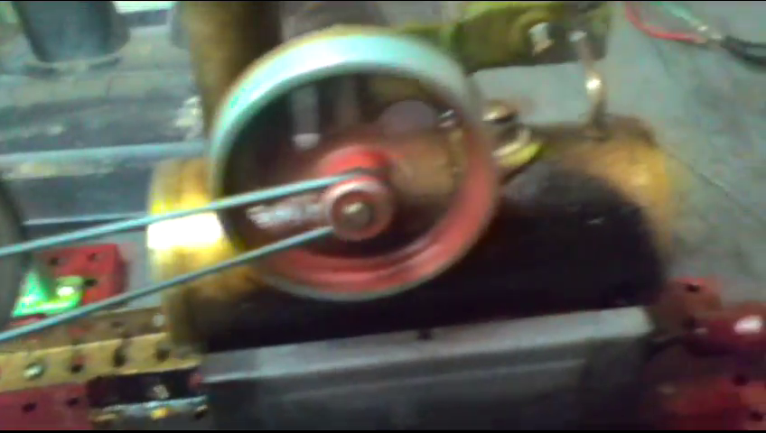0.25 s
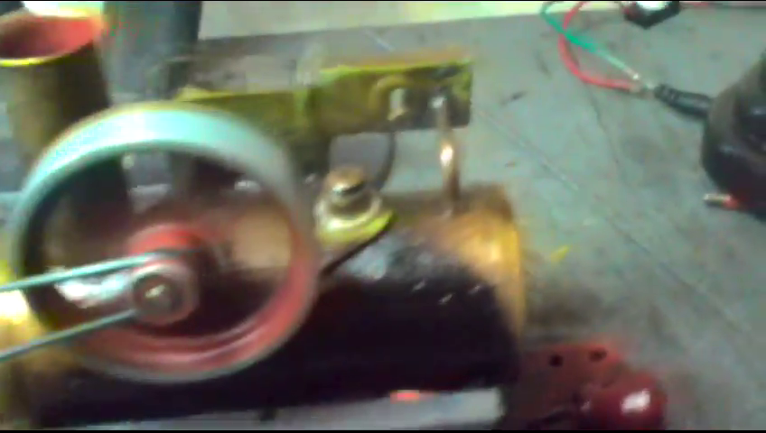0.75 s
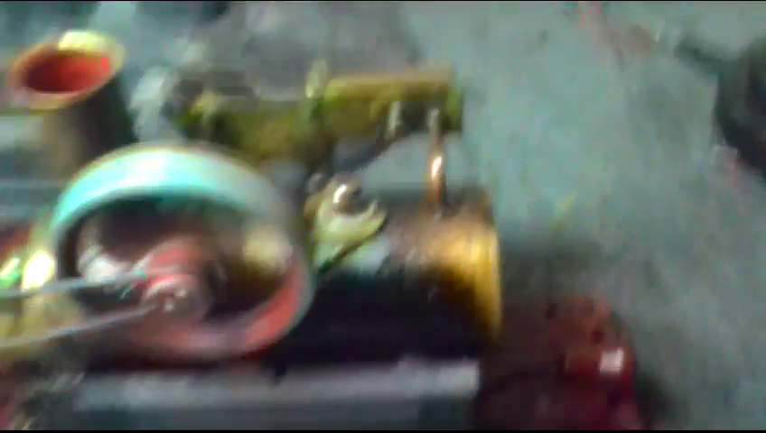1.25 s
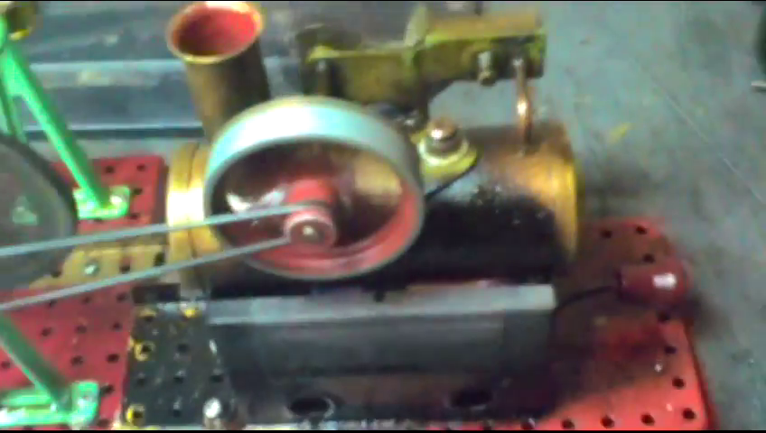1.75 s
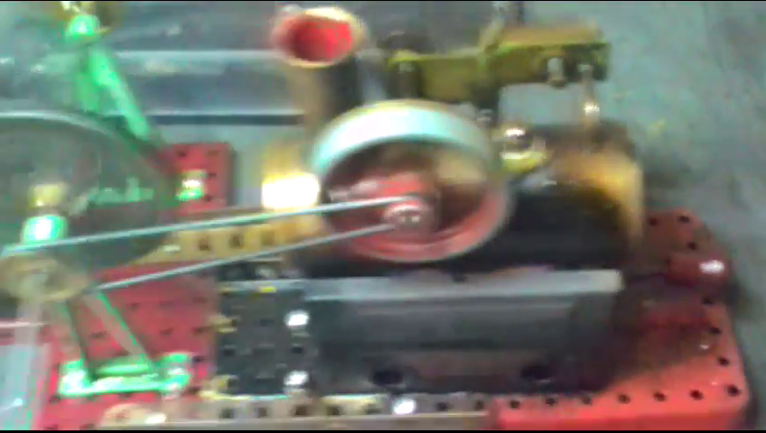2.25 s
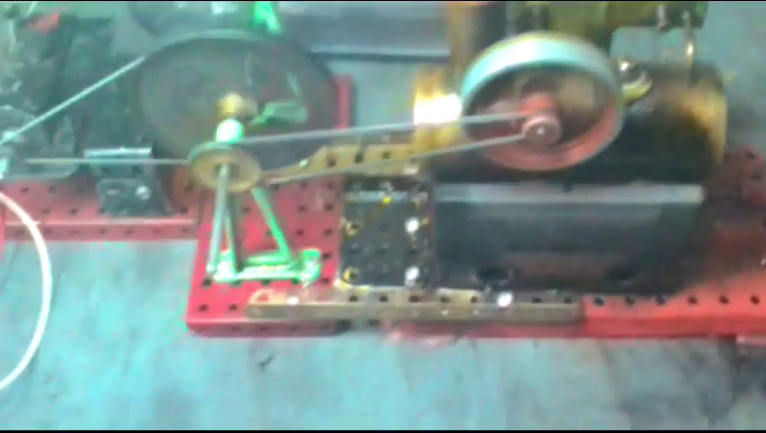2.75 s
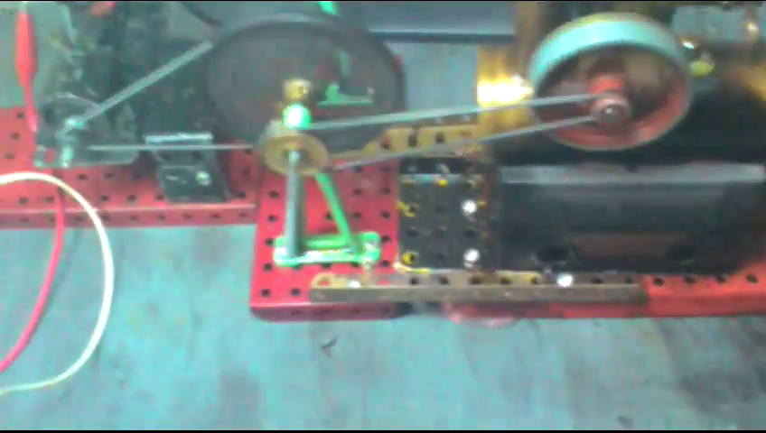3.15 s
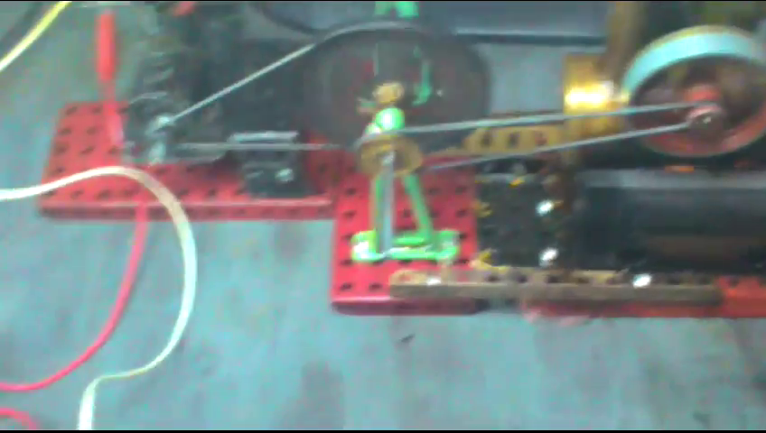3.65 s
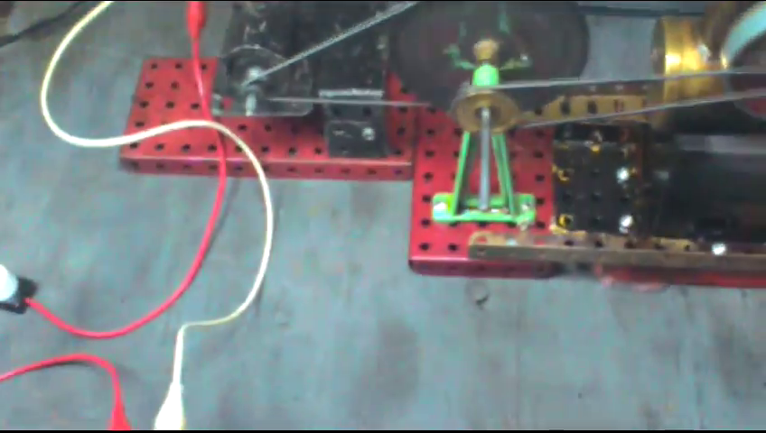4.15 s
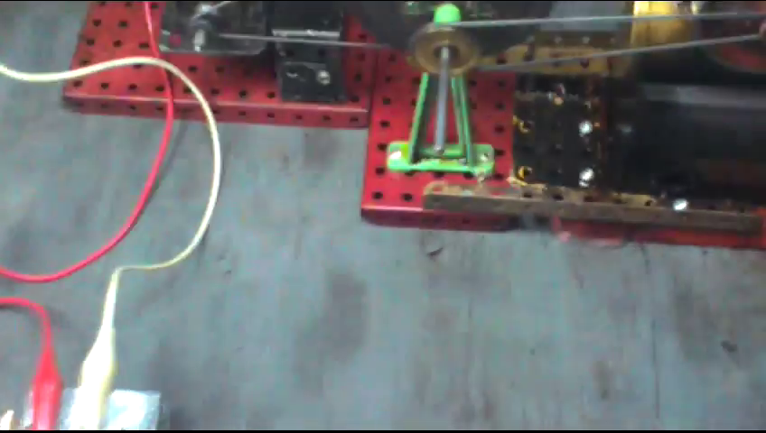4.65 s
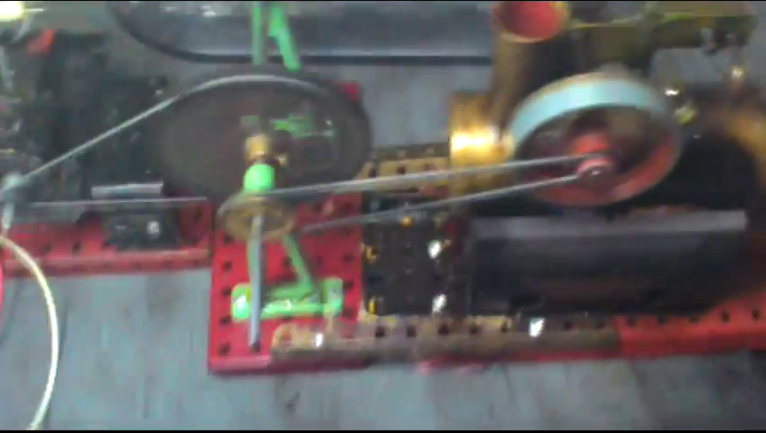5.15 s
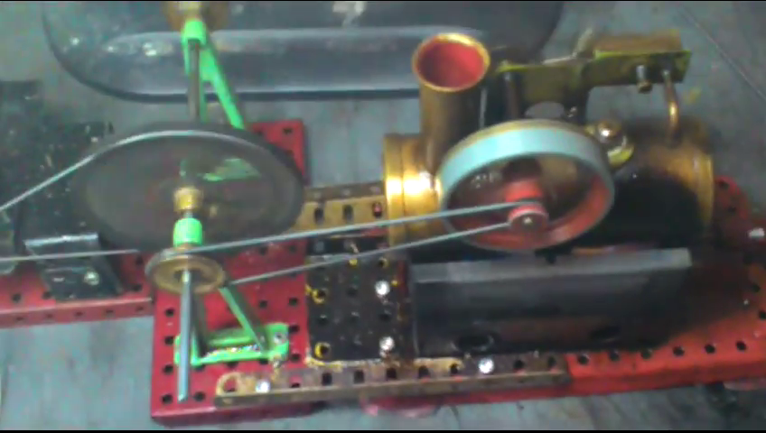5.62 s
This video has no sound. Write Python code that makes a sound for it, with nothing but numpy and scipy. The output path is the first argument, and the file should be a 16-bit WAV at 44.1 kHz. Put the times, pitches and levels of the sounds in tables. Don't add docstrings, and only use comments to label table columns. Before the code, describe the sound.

A model steam engine runs without pause on a metal base plate in a room. Its loose crank knocks about twenty-six times a second, each knock trailed by tiny clicks and rattles, fusing into a rough metallic buzz over a low plate hum. A close hand-held microphone starts at the boiler, bright and clattery, backs off to a duller, ringing whirr, then nears the shaft and grows louder.

```python
import sys
import numpy as np
from scipy import signal
from scipy.fft import rfft, irfft
from scipy.io import wavfile
from scipy.ndimage import uniform_filter1d

SR = 44100
rng = np.random.default_rng(int(sys.argv[2]) if len(sys.argv) > 2 else 0)


def how_loud(loudness_db):
    steps = np.asarray(loudness_db, float) / 20
    return 10 ** steps


def materialize(psi):
    bounded = np.clip(np.atleast_2d(psi).T, -1, 1)
    quanta = np.round(bounded * 32767).astype(np.int16)
    wavfile.write(sys.argv[1], SR, quanta)


N = 259352

TURN_S, FIRST_KNOCK_S = 0.03769, 0.0361
BELT_S, BELT_START_S, BELT_SWING_MS, BELT_TIGHT_S = 0.75, 0.018, 0.48, 0.45
# time_s, knock_late_ms
SPEED_DRIFT = [(0, 1.11), (.6, -.68), (1.3, -1.12), (2, .78), (2.8, -.59), (3.5, .79), (4.2, .89),
               (4.8, 1.26), (5.4, -.68), (5.88, -3.07)]
# time_s, force_db
KNOCK_FORCE = [(0, 3), (.4, 4), (.9, -1.5), (1.2, 0), (1.6, -3), (1.95, 6), (2.25, 1), (2.72, 6.5),
               (3.0, -1), (3.25, 0.5), (3.36, 6.5), (3.7, 0.5), (3.98, -3.5), (4.04, 3.5), (4.35, -2),
               (4.72, -4), (4.85, 2.5), (5.88, 4)]
# pitch_hz, fade_60db_s, signed_strength_thousandths, after_knock_ms
BASE_MODES = [(115.0, 0.058, -3.8, 2.25), (156.2, 0.145, -3.95, 0.53), (242.1, 0.221, 8.7, 1.67),
              (261.8, 0.028, -7.84, 10.74), (332.1, 0.048, 7.02, 2.91)]
# after_knock_ms, decay_ms, frame_db, linkage_db, flywheel_db, boiler_db, steam_db
BOUNCES = [
    (0.511, 4.9, 6, 7.5, 0, 0, 4),
    (2.58, 4.15, 4.5, 9, -7.5, -2.5, -9),
    (6.23, 2.3, -26, -16, -5.5, -24, -25),
    (9.206, 0.36, -1, 7, -20, 5, -4),
    (13.43, 4.8, -6.5, -11.5, -9, -49, -2),
    (16.75, 1.36, -4.5, -21, -19, -2.5, 2),
    (24.24, 4.3, -8.5, -22, -33, -20, -25),
    (29.1, 5.2, -2, -10.5, -37, -41, -16.5),
]

RUBBING_DB = [-8, -8, -23, -17.5, -27.5]
REPEAT_SHARE = [0.892, 0.9, 0.885, 0.63, 0.15]
CRANK_BLOW_DB = [24, 26.5, 26.5, 21, 9]
CRANK_BLOW_MS = [1.2, -.3, -.8, -.4, -.7]
REBOUND_DB = [-9, -3.5, -8.5, -3.5, -3]
REBOUND_MS = 2.4
TURN_SPREAD_DB = [.8, 1.2, 1.7, 2.06, 3.2]
WEAK_MODES_DB = [-30, -24, -47, -30, -60]
PART_EDGES_HZ = [370, 2450, 4400, 5400, 8300, 15800]

# pitch_hz, width_hz, boiler_view_db, backing_off_db, far_db, shaft_view_db
FRAME_MODES = [(448, 59, -18, -19.5, -14.5, -7.5), (551.5, 94, -18, -15.5, -24.5, -13.5),
               (649.5, 66, -8.5, -14.5, -23, -12), (779, 101, -17, -23.5, -27, -18),
               (899.5, 79, -17.5, -34, -26, -21.5), (1043, 60, -15.5, -41, -17, -16.5),
               (1130, 73, -17, -13.5, -18.5, -19), (1222, 61, -27.5, -26.5, -16.5, -8.5),
               (1367, 109, -28, -27, -23, -14), (1478, 98, -15.5, -18.5, -24, -21.5),
               (1651, 58, -11, -20.5, -29, -20), (1807, 191, -10, -16.5, -24.5, -18.5),
               (2048, 125, -14, -20, -26, -20), (2334, 440, -21, -22, -32.5, -31.5)]
LINKAGE_MODES = [(2799, 16, -16.5, -18.5, -19.5, -18), (2940, 69, -12.5, -22, -26, -11),
                 (3030, 112, -10.5, -22, -22.5, -9), (3308, 137, -14, -14.5, -29, -17),
                 (3487, 103, -16.5, -16.5, -25, -10.5), (3984, 250, -52, -14, -14, -17),
                 (4188, 96, -18, -4, -20.5, -7)]
FLYWHEEL_MODES = [(4574, 102, -6, -11, -23, -1), (4794, 137, -34, -11, -13, -3),
                  (4884, 175, -30, -18, -6.5, -6), (5020, 115, -23, -11.5, -4.5, -30)]
BOILER_MODES = [(5620, 33, -33, -37, -10, -3), (5866, 147, -0.5, 4, -9.5, -6.5),
                (6135, 250, 1, -1.5, -21, -10.5), (6380, 360, -3.5, -5.5, -27.5, -3.5),
                (6950, 150, -10, -18, -25.5, -9), (7230, 473, -10, -20, -20.5, -17.5),
                (7710, 100, -24, -18, -26, -23)]
STEAM_MODES = [(8370, 180, -34, -27, -32, -28), (9120, 280, -31.5, -34, -42, -36),
               (10040, 120, -24.5, -27.5, -42, -39), (11050, 780, -41, -41.5, -43, -41),
               (12750, 870, -47, -49, -55, -53), (15400, 600, -72, -64, -78, -56)]

# time_s, position (0 over the boiler, 1 backing off, 2 far, 3 over the shaft)
POSITION = [(0, 0), (.6, 0.03), (1.2, 0.28), (1.35, 0.68), (1.75, 0.77), (2.2, 1.4), (2.6, 1.79), (3.3, 2),
            (3.9, 2), (4.3, 2.5), (4.6, 2), (4.85, 2.6), (5.3, 2.5), (5.88, 2.5)]
RUBBING_GAIN_DB = [0.82, 1.5, 4.44, 4.5]
RUBBING_STAYS = 0.32

# boiler_view_db, backing_off_db, far_db, shaft_view_db
PART_LOUDNESS = [(-46, -46.5, -46.5, -44), (-43, -48.5, -50, -43), (-44.5, -45, -48, -42),
                 (-47, -46.5, -41, -34.5), (-35.5, -39.5, -47.5, -40.5), (-62.5, -64, -62, -55.5)]
FORCE_SHARE = [0.0071, -0.026, 0.6, 0.76, 0.38, 0.012]
BELT_SWELL_DB = [-0.43, 1.35, 0.32, .3, -0.48, -.3]
# time_s, over_hiss_db
STEAM_SPITS = [
    (.4, 5.5),
    (2.42, 3),
    (3.82, 4),
    (5.1, 2.5),
]
SPIT_S = 0.037

# pitch_hz, level_db
ROOM_RUMBLE = [(20, -3), (60, -3.5), (150, -0.5), (330, 8), (500, -10), (900, -5.5), (3000, -28.5)]
RUMBLE_DB = -60.5
# pitch_hz, left_lag_rad
OPENING_LAG = [(500, 0.0025), (1500, 0.043), (3000, 0.19), (4600, 0.61), (6200, 0.67), (7800, 0.38),
               (10000, 0.1), (15000, .8)]
# pitch_hz, side_db
SCATTERED = [(60, -28), (130, -48), (290, -70), (640, -21), (1400, -19), (3100, -13.5), (4800, -23),
             (6500, -9), (8000, -3.5), (11000, -1.5)]
# pitch_hz, share_of_time
DROPOUTS = [(1800, 0), (2500, 0.04), (3200, 0), (7500, 0.02), (8600, 0.097), (9400, 0.19), (11000, 0.032),
            (12500, .45), (14000, .75), (15500, .78)]


def rms_one(x):
    return x / np.sqrt(np.mean(x ** 2) + 1e-20)


def in_time(rows):
    s, value = np.transpose(rows)
    return np.interp(np.arange(N) / SR, s, value)


def at_hz(points):
    hz, value = np.transpose(points)
    return np.interp(np.log(np.fft.rfftfreq(N, 1 / SR) + 1), np.log(hz), value)


def at_position(values):
    return np.interp(in_time(POSITION), range(4), values)


def steady(x):
    return x / np.sqrt(uniform_filter1d(x ** 2, round(4 * TURN_S * SR)) + 1e-20)


def resonance(x, hz, width):
    r = np.exp(-np.pi * 1.55 * max(width, hz / 70) / SR)
    b = np.array([1, 0, -1]) * (1 - r * r) / 2
    a = [1, -2 * r * np.cos(2 * np.pi * hz / SR), r * r]
    return signal.lfilter(b, a, signal.lfilter(b, a, x))


def rumble():
    noise = rng.standard_normal(N)
    return how_loud(RUMBLE_DB) * rms_one(irfft(rfft(noise) * how_loud(at_hz(ROOM_RUMBLE)), N))


def knocks():
    even = FIRST_KNOCK_S + TURN_S * np.arange(-10, 158)
    drift_ms = np.interp(even, *np.transpose(SPEED_DRIFT))
    swing_ms = BELT_SWING_MS * np.sin(2 * np.pi * (even - BELT_START_S) / BELT_S)
    return np.round((even + (drift_ms + swing_ms) / 1000) * SR).astype(int)


def base_plate(at, level_db):
    lead = -at[0]
    out = 0
    strength = how_loud(rng.normal(0, 0.13, len(at)))
    for hz, t60, push, after_ms in BASE_MODES:
        clicks = np.zeros(at[-1] + lead + SR // 10)
        clicks[at + lead + round(after_ms * SR / 1000)] = push * strength
        r = how_loud(-60 / (t60 * SR))
        w = 2 * np.pi * hz / SR
        out = out + signal.lfilter([0, np.sin(w)], [1, -2 * r * np.cos(w), r * r], clicks)
    band = signal.butter(6, [68, 392], "band", fs=SR, output="sos")
    return how_loud(level_db) * steady(signal.sosfiltfilt(band, out)[lead:lead + N])


def bounce_power(turns, ms, part):
    power = np.zeros((turns, len(ms)))
    for k, (after_ms, decay_ms, *level_db) in enumerate(BOUNCES):
        wander = rng.standard_normal((turns, 2)) * np.array([0.08, 1.5]) * (1 + 0.32 * k)
        age = (ms - after_ms - wander[:, :1]) / decay_ms
        fade = (age > 0) * np.exp(-2 * np.maximum(age, 0))
        power += how_loud(2 * (level_db[part] + wander[:, 1:])) * fade
    return power


def crank_blow(turns, ms, part):
    strength = how_loud(CRANK_BLOW_DB[part] + 0.5 * rng.standard_normal((turns, 1)))
    blow = strength * (np.arange(len(ms)) == np.argmax(ms > CRANK_BLOW_MS[part]))
    rebound_ms = CRANK_BLOW_MS[part] + REBOUND_MS + 0.054 * rng.standard_normal(turns)
    rebound_db = CRANK_BLOW_DB[part] + REBOUND_DB[part] + rng.standard_normal(turns)
    blow[np.arange(turns), np.searchsorted(ms, rebound_ms)] = how_loud(rebound_db)
    return blow


def rattle(at, part, rubbing_gain_db):
    turn = np.searchsorted(at, np.arange(N), side="right") - 1
    since = np.arange(N) - at[turn]
    ms = np.arange(since.max() + 1) * 1000 / SR - 1
    turns = len(at)
    keep = np.clip(REPEAT_SHARE[part], 0, 0.99)
    fresh = rng.standard_normal((turns + 30, len(ms))) * how_loud(3.0 * rng.standard_normal(len(ms)))
    grains = signal.lfilter([np.sqrt(1 - keep ** 2)], [1, -keep], fresh, axis=0)[30:]
    bursts = grains * np.sqrt(bounce_power(turns, ms, part))
    blow = crank_blow(turns, ms, part)
    rubbing = how_loud(RUBBING_DB[part] + rubbing_gain_db) * rng.standard_normal(N)
    b, a = signal.butter(1, 1100, "high", fs=SR)
    return blow[turn, since] + signal.lfilter(b, a, bursts[turn, since] + rubbing)


def engine(at, levels_db):
    rubbing_gain_db = at_position(RUBBING_GAIN_DB) - RUBBING_STAYS * in_time(KNOCK_FORCE)
    out = 0
    for part, modes in enumerate([FRAME_MODES, LINKAGE_MODES, FLYWHEEL_MODES, BOILER_MODES, STEAM_MODES]):
        force = rattle(at - SR // 1000, part, rubbing_gain_db)
        sound = how_loud(WEAK_MODES_DB[part]) * force
        for hz, width, *position_db in modes:
            change = np.interp(np.arange(N), at, rng.standard_normal(len(at)))
            level_db = at_position(position_db) + TURN_SPREAD_DB[part] * change
            sound = sound + how_loud(level_db) * resonance(force, hz, width)
        band = signal.butter(4, PART_EDGES_HZ[part:part + 2], "band", fs=SR, output="sos")
        out = out + how_loud(levels_db[part]) * steady(signal.sosfilt(band, sound))
    return out


def part_levels():
    t = np.arange(N) / SR
    force_db = in_time(KNOCK_FORCE)
    near_shaft = np.clip(in_time(POSITION) / 2, 0, 1)
    pull = near_shaft * np.cos(2 * np.pi * (t - BELT_TIGHT_S) / BELT_S)
    levels_db = []
    for position_db, share, belt_db in zip(PART_LOUDNESS, FORCE_SHARE, BELT_SWELL_DB):
        levels_db.append(at_position(position_db) + share * force_db + belt_db * pull)
    for s, db in STEAM_SPITS:
        levels_db[-1] = levels_db[-1] + db * np.exp(-((t - s) / SPIT_S) ** 2)
    return levels_db


def two_openings(x):
    lag = np.exp(-0.5j * at_hz(OPENING_LAG))
    slow = signal.butter(2, 150, fs=SR, output="sos")
    restless = rms_one(signal.sosfilt(slow, rng.standard_normal(N)))
    side = restless * irfft(rfft(x) * how_loud(at_hz(SCATTERED)), N)
    return irfft(rfft(x) * np.array([lag, np.conj(lag)]), N) + side * [[1], [-1]]


def scene():
    base_db, *parts_db = part_levels()
    at = knocks()
    return two_openings(rumble() + base_plate(at, base_db) + engine(at, parts_db))


def drop_quiet_bands(x):
    hz, s, z = signal.stft(x, SR, nperseg=1024)
    shared_db = 7.0 * uniform_filter1d(rng.standard_normal(len(s)), size=3)
    for low in range(36, 372, 12):
        band = z[:, low:low + 12]
        level_db = 10 * np.log10(np.mean(abs(band) ** 2, axis=(0, 1)) + 1e-20)
        level_db = level_db - uniform_filter1d(level_db, size=40)
        level_db = level_db + shared_db + 2.0 * rng.standard_normal(len(s))
        share = np.clip(np.interp(hz[low + 6], *np.transpose(DROPOUTS)), 0, 0.95)
        z[:, low:low + 12] = band * (level_db >= np.quantile(level_db, share))
    z[:, 369:] = 0
    return signal.istft(z, SR, nperseg=1024)[1][:, :N]


def top_cut(x):
    return signal.sosfilt(signal.butter(12, 15860, fs=SR, output="sos"), x)


def record(dry):
    b, a = signal.iirnotch(2480, 6.0, fs=SR)
    notched = dry + 0.93 * (signal.lfilter(b, a, dry) - dry)
    mix = drop_quiet_bands(notched)
    return top_cut(mix)


dry = scene()
out = record(dry)
materialize(out)
```